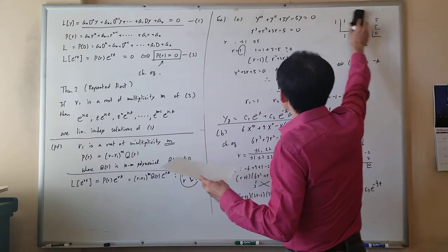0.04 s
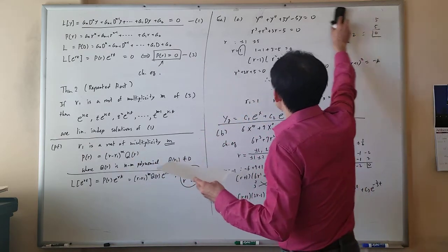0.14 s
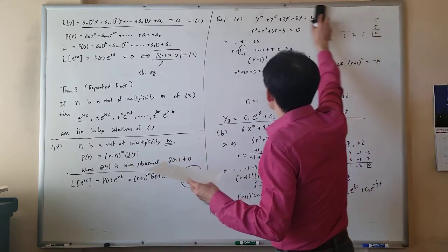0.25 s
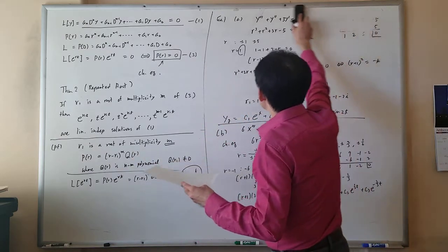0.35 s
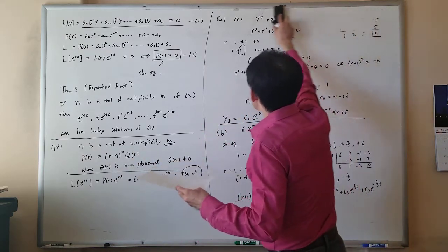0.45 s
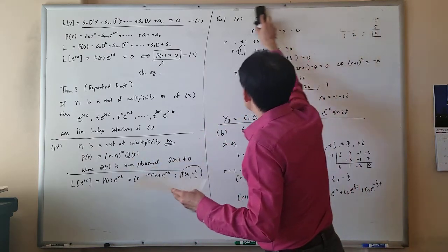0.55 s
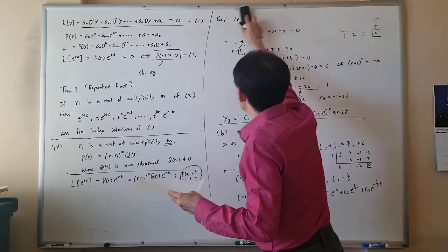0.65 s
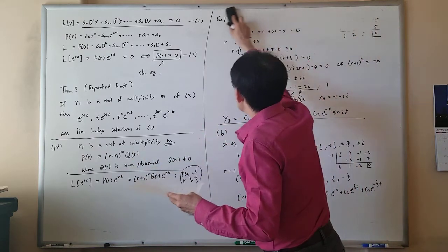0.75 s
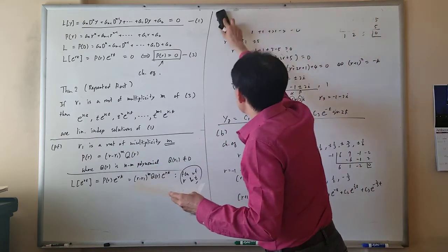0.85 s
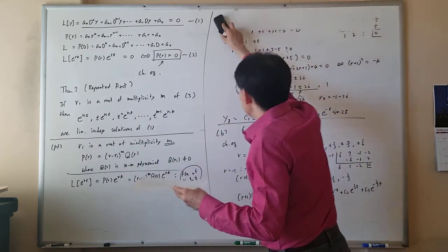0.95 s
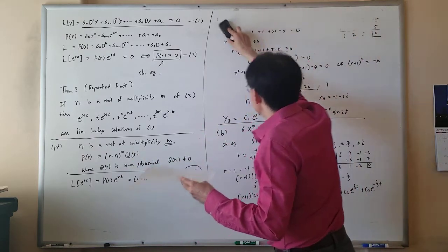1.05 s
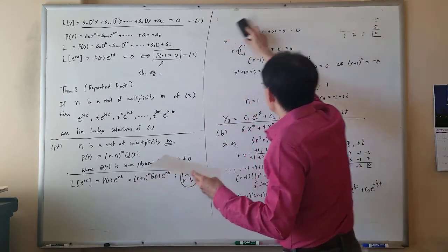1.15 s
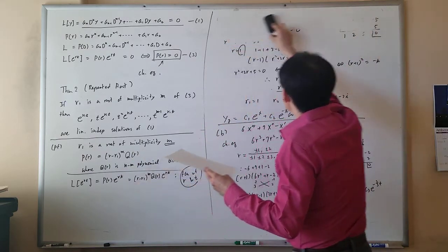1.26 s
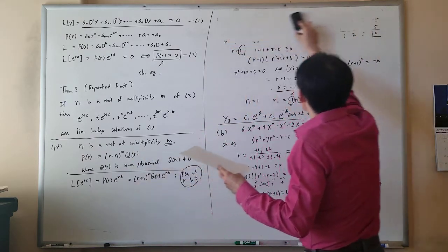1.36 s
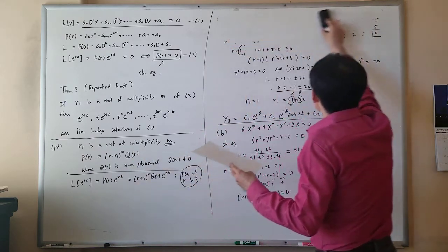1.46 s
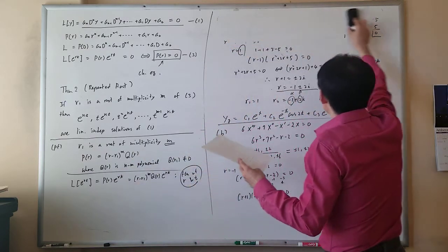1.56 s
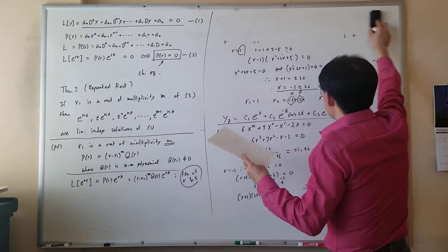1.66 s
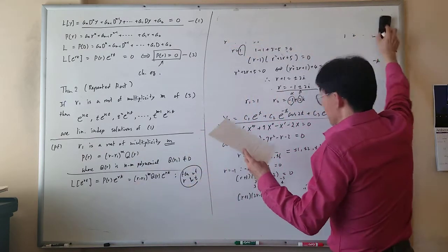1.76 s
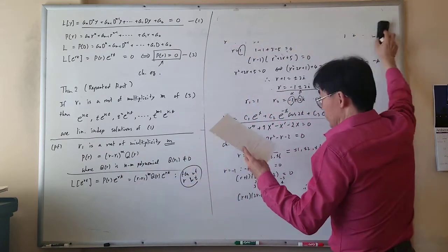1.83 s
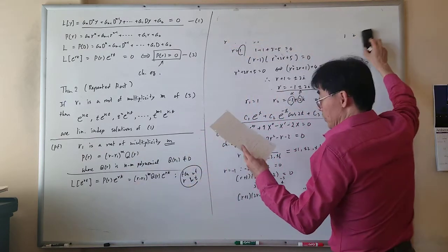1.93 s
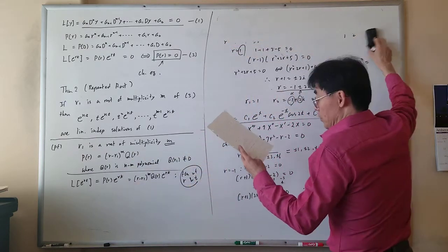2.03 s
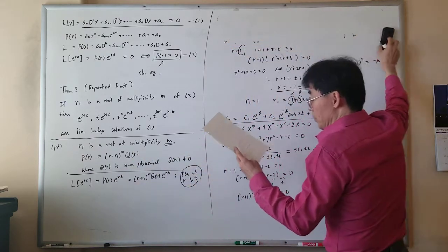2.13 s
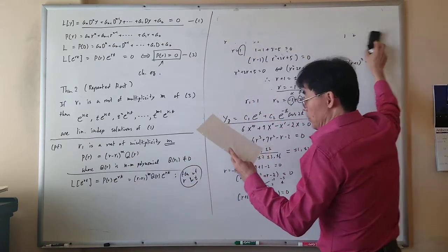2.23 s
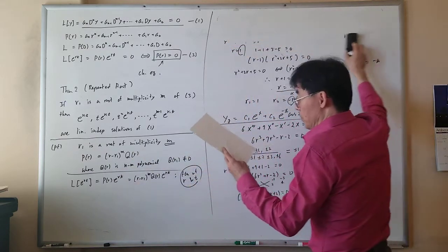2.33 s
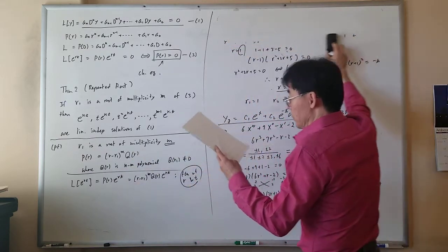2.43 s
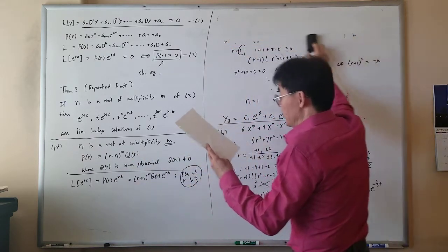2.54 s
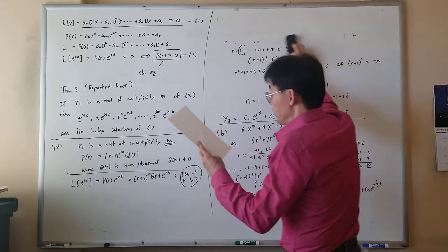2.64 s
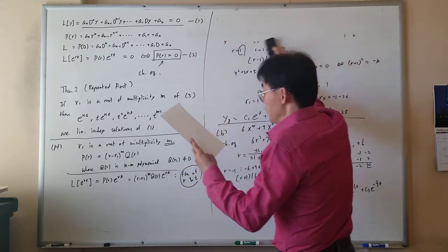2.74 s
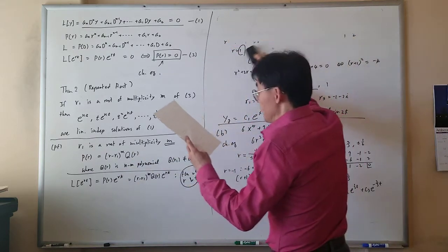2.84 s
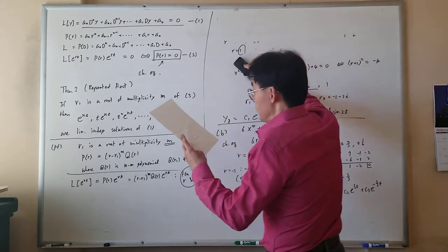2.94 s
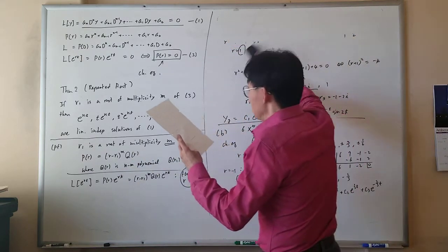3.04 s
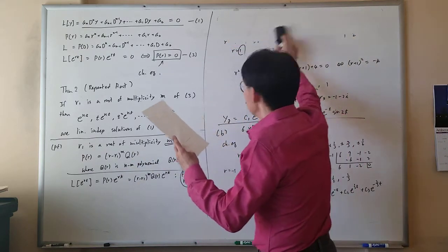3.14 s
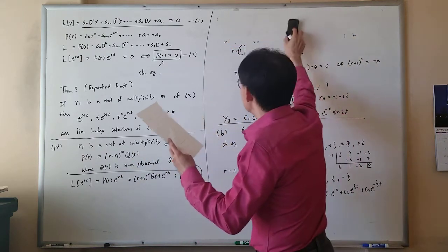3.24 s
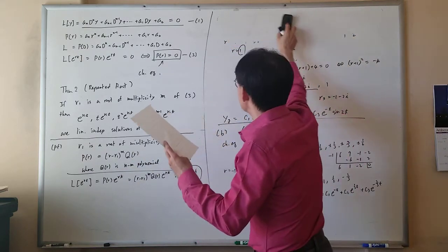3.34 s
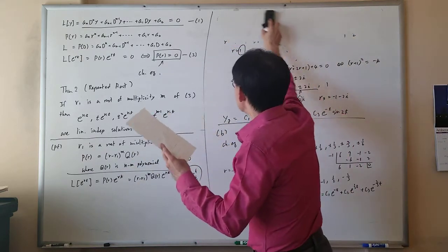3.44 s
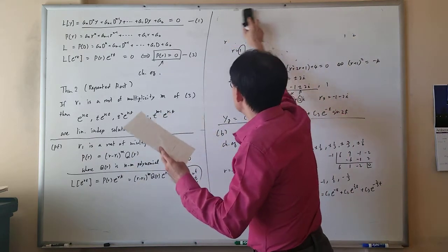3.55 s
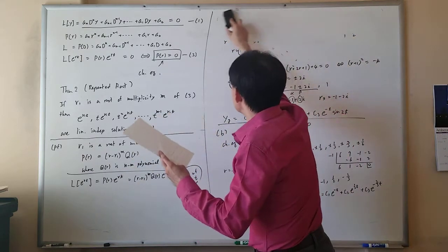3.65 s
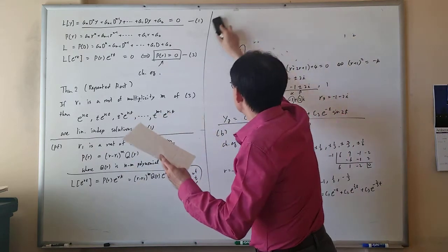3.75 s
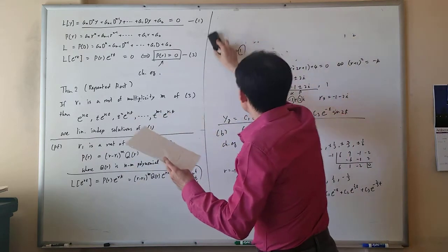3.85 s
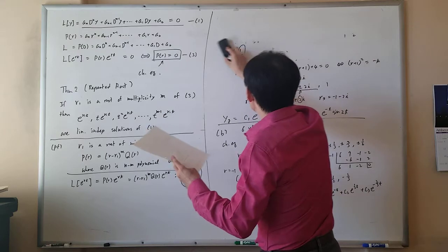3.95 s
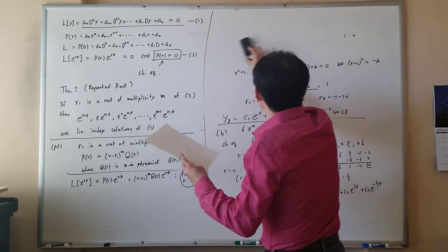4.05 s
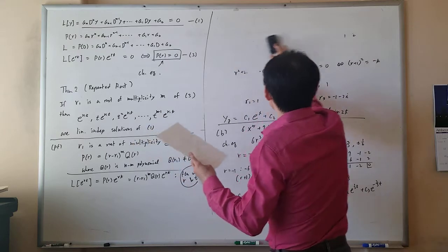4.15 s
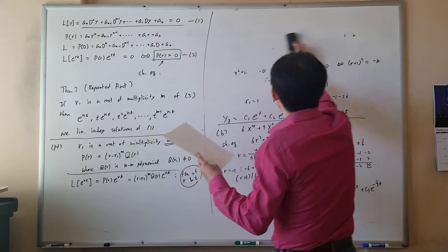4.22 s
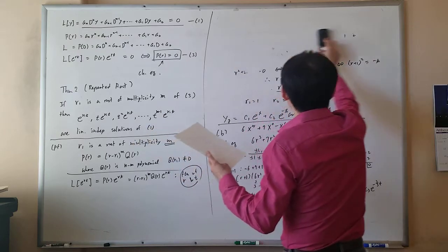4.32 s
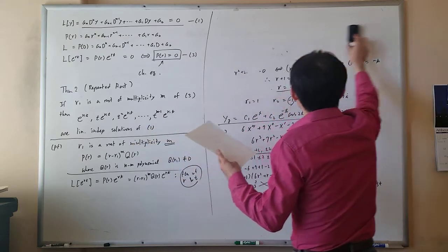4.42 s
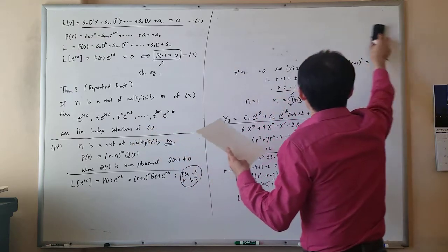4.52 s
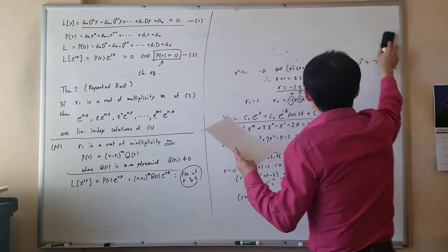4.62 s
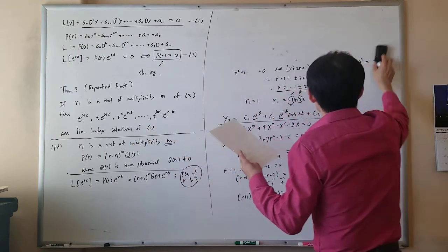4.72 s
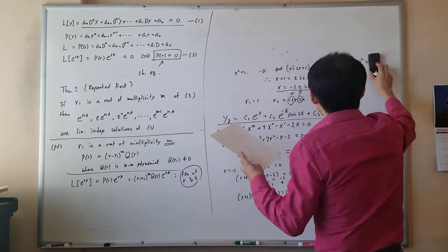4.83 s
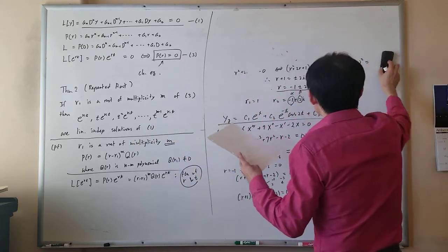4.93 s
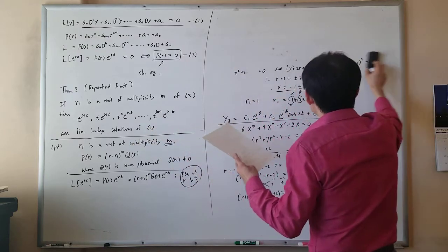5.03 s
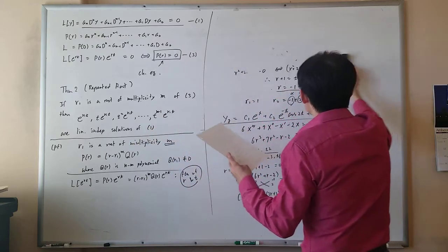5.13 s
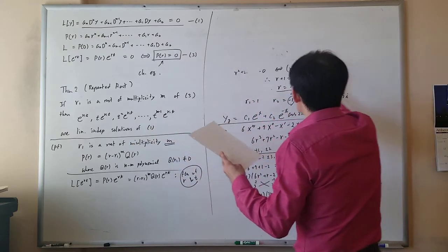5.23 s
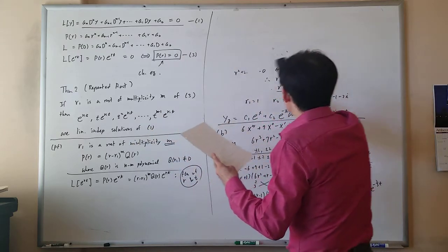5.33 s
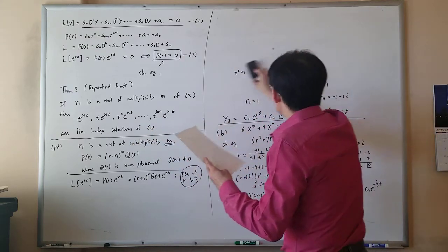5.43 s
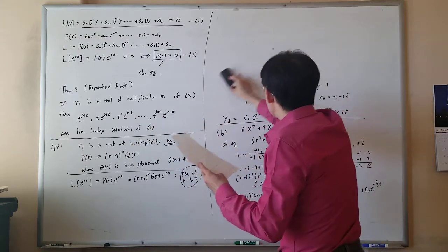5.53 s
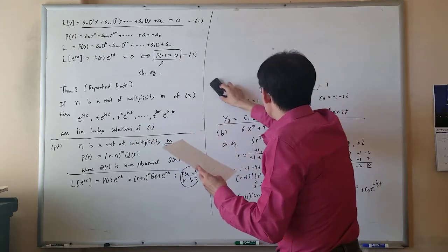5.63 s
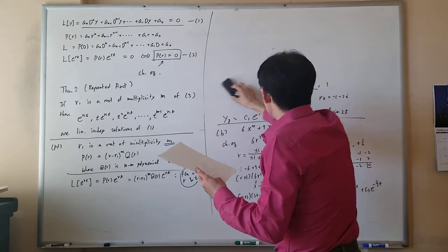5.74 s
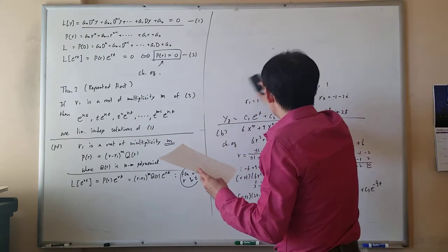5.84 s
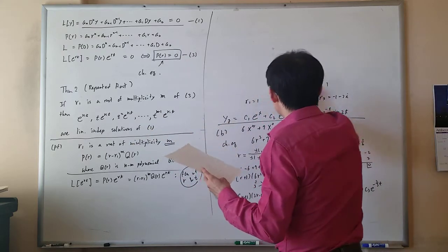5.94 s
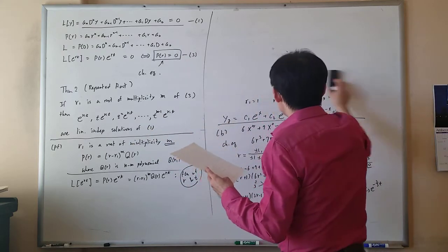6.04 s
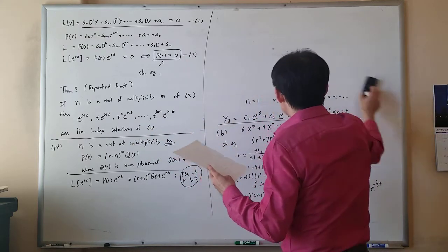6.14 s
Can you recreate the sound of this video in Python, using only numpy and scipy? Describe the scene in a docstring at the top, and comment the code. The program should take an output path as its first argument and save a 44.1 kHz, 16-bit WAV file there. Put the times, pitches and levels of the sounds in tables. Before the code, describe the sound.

In a quiet classroom, a felt eraser rubs a whiteboard in long and short airy hisses that swell and fade. Early on the panel thuds softly, then a knock and quick double click mark the felt being set down. More wipes follow, strongest in the later half, with another dull bump near the end. A faint low fan hums beneath. The stereo pickup is fairly close, its treble opening abruptly with stronger strokes.

```python
"""A felt eraser sweeps to and fro over a wall whiteboard in a quiet classroom, while a ventilation fan hums far off.
Long and short strokes run throughout, each a coloured hiss that swells and fades.
In the first second the panel is bumped and rings, at about 1.0 s the felt edge clicks down twice, and near 5 s
the panel is bumped again. All through, a noise suppressor holds steady treble down and lets each treble band
of each microphone jump forward while a stroke stands above that band's recent average."""
import sys
import numpy as np
from scipy import signal
from scipy.fft import rfft, irfft, next_fast_len
from scipy.io import wavfile
from scipy.ndimage import uniform_filter1d, map_coordinates

SR = 44100
rng = np.random.default_rng(int(sys.argv[2]) if len(sys.argv) > 2 else 0)


def master(y):
    """Save y as 16-bit WAV."""
    cut = np.clip(np.atleast_2d(y).T, -1, 1)
    pcm = np.round(cut * 32767)  # scale
    wavfile.write(sys.argv[1], SR, pcm.astype(np.int16))


N = 272538  # length in samples, about 6.2 s

# The arm's strokes, each from one turn to the next. Each row: turn in seconds, rub at the turn in dB,
# fastest moment in seconds, rub there in dB, power of the rising arch, power of the falling arch,
# felt pressure at start and at end in dB, brightness at start and at end in dB, left minus right in dB.
STROKES = [(0, -77, 0.72, -58, 0.63, .6, 9.5, 3, 1.5, -2, 0.5),
           (.89, -62.5, 1.04, -62.5, 1, 1, -4.5, -0.5, -13, -11, 2.5),
           (1.004, -56, 1.014, -52, 1, 2.4, -1.5, 3, -1, -1, .5),
           (1.207, -57, 1.555, -52, 0.83, 0.45, 1, -1, 5, 1, 0.65),
           (1.81, -61.5, 1.9, -62, 1, 0.99, -0.5, 5.5, -5.5, -5, 2),
           (2.17, -75, 2.53, -58, 0.3, 0.15, 1, -1.5, -1.5, -3.5, 1.95),
           (2.986, -72, 3.03, -61, 0.58, 0.56, -0.5, 0, -1, -5, 2),
           (3.3, -69.5, 3.645, -58.5, 0.76, 1.4, 3.5, -0.5, -6, -1.5, 1.2),
           (3.76, -61, 3.88, -56.5, 0.64, 1.3, 0, -3, -4.5, -2.5, 1),
           (3.99, -56, 4.295, -50, 0.79, 0.85, 3, 4, 3, 2, 1.5),
           (4.65, -64.5, 4.75, -59.5, 1.1, 0.76, 1.5, 0.5, -6, 1, 1.9),
           (4.95, -68.5, 5.46, -51.5, 0.87, 0.92, 3, 5, 2.5, -0.5, 1.5),
           (5.69, -63, 5.976, -51, 1.288, 1.17, 4, 8, 3, 1.5, 2),
           (6.3, -60, 6.4, -60, 1, 1, 5, 5, 0, 0, 2.5)]
DULLING = 0.47  # dB of brightness lost for each dB that the rub lies under its stroke's top
REGRIP_S = 0.11  # seconds over which pressure, brightness and side glide

# Basic colour of the felt's hiss. Each row: frequency in Hz, level in dB per Hz.
FELT_COLOUR = [(180, -29.5), (300, -20), (392, -16), (433, -20.5), (494, -17), (656, -13), (1010, -10.5),
               (1510, -8), (1690, -6.5), (2360, -2), (4440, 0), (5520, -0.5), (9090, -9.5), (13100, -8),
               (16000, -14.5)]
# The felt block's broad resonance: centre in Hz, width in Hz, boost in dB.
BLOCK_RESONANCE = (2350, 390, 2.26)
# Where pressure adds hiss. Each row: frequency in Hz, share from 0 to 1.
PRESSURE_SHARE = [(4600, 0.02), (5500, 0.75), (6800, 0.82), (8000, 1), (9400, 0.76)]
# Where brightness, which drops as the arm slows, adds hiss. Each row: frequency in Hz, share from 0 to 1.
BRIGHTNESS_SHARE = [(7500, 0), (11000, 0.68), (16000, 0.93)]
# Fast strokes thin out the low rub. Each row: frequency in Hz, dB for each dB of rub above its median.
LOW_THINNING = [(250, -0.3), (800, -0.05), (2000, 0)]
# Random patches of louder and softer hiss, below 5000 Hz. Each row: frequency in Hz, depth in dB.
PATCH_DEPTH = [(400, 2.5), (4000, 1.84), (5000, 0)]
# For a while, a band of the hiss is louder or softer on the left or right.
# Each row: start in seconds, end in seconds, centre in Hz, left change in dB, right change in dB.
BAND_CHANGES = [(0.213, 0.97, 10700, -4.5, 0), (0.22, 0.85, 14200, 2.5, -7), (0.31, 0.86, 5500, -2.5, -1),
                (1.186, 1.27, 10200, -5, -6), (2.42, 2.547, 5450, 0.5, 3.5), (3.397, 3.655, 5600, 2, 1.5),
                (3.754, 3.983, 14000, 4.5, -1), (2.45, 3.3, 2370, 1.5, 1.5), (1.2, 1.73, 5550, -3.5, -2),
                (1.65, 1.785, 9100, -5, -8.5), (2.327, 2.75, 7000, 1.5, -0.5), (2.55, 2.846, 10900, 1, 7),
                (3.53, 3.82, 10500, -3, 5.5), (3.536, 3.77, 13300, 7, -1), (3.77, 4, 11200, -1, 7.5),
                (3.99, 4.1, 12600, 4, 3.5), (4.45, 4.58, 12500, 3.5, 3.5), (5.81, 5.9, 12400, 2, 3),
                (5.16, 5.7, 5330, -3.5, -4.5), (5.1, 5.29, 13000, 0, -5), (0.45, 1.17, 1450, 7.5, 4.5),
                (1.48, 2.3, 514, 6.5, 7), (5.2, 6.05, 610, -12, -9)]

# Bumps on the panel. Each row: start in seconds, level in dB before the panel's own colour,
# pitch centre in Hz, spread in octaves, rise in seconds, time to fall 60 dB in seconds.
BUMPS = [(0.304, -51, 376, 0.27, 0.03, 0.32), (.305, -51.5, 160, 0.53, 0.016, 0.34),
         (.40, -55, 100, .3, 0.0062, 0.3), (.50, -48.5, 101.5, 0.33, 0.015, 0.17),
         (.88, -55.5, 610, .8, 0.076, 1), (.974, -46, 600, .25, .002, 0.14),
         (1.013, -47.5, 543, .25, 0.002, 0.076), (1.04, -58.5, 540, 1.1, 0.022, 0.21),
         (4.951, -53, 448, 0.85, 0.069, 0.37), (5.035, -49, 103, 0.28, 0.011, 0.19),
         (5.06, -51, 320, 0.32, 0.0085, 0.095)]
# Ringing modes of the panel. Each row: frequency in Hz, strength in dB.
PANEL_MODES = [(98, 0), (170, -8.5), (250, -1), (325, 1.5), (400, 2), (505, 1.5), (590, 1.5), (700, -7),
               (820, 3.5), (1050, 12), (1500, -5)]
# The felt edge clicks down. Each row: start in seconds, level in dB before smoothing,
# time to fall 60 dB in seconds.
EDGE_CLICKS = [(1.0045, -31, .012), (1.014, -36, .015)]

# Colour of the room's air noise. Each row: frequency in Hz, level in dB per Hz.
AIR_COLOUR = [(12, -70), (20, -36), (53, -39), (98, -3), (198, -17.5), (319, -22), (446, -22.5), (527, -17),
              (1150, -17), (2320, -24), (2530, -19), (5530, -17.5), (16000, -24.5)]
AIR_DB = -65.5  # air noise before the room's level curve
# The fan's blade orders. Each row: frequency in Hz, width in Hz, level in dB before the room's level curve.
FAN_ORDERS = [(58.6, 13, -84), (66, 12, -84), (93.2, 13, -79), (124.2, 7.2, -77), (159.6, 3.8, -83),
              (191.8, 3.9, -94)]
# Level of hum and air together: it drops quickly at the start, recovers, then drifts.
# Each row: time in seconds, change in dB.
ROOM_LEVEL = [(0, 3.5), (.15, -8.5), (.4, -2.5), (1, 0), (1.8, 1.5), (2.6, -1), (3.6, -1), (4.5, 0),
              (5.3, -0.5), (6.18, 2)]
# How alike left and right are. Each row: frequency in Hz, likeness from 0 to 1.
SIDE_LIKENESS = [(60, 0.77), (250, 0.57), (500, 0.52), (1000, 0.008), (16000, 0.016)]

# The microphone's treble colour. Each row: frequency in Hz, change in dB.
MIC_COLOUR = [(6000, 0), (8000, 1.5), (8500, -1), (10500, 0)]
# Edges of the suppressor's bands, in Hz.
BAND_EDGES = [5020, 5950, 7600, 9400, 12100, 16500]
# The suppressor's bands. Each row: left margin in dB, right margin in dB, depth in dB.
SUPPRESSOR_BANDS = [(3, 3.5, 17), (1.5, 2.5, 19.5), (2, 1, 18.5), (3, 1, 17.5), (4.5, 4, 16)]
TOP_HZ = 15780  # nothing passes from here up


def amp(db):
    """Turn dB into gain."""
    return 10 ** (np.asarray(db) / 20)


def unit(x):
    """Scale x to rms 1."""
    return x / np.sqrt(np.mean(x ** 2) + 1e-20)


def along(points, at):
    """Read a curve of (Hz, value) points on a log frequency axis."""
    f, values = np.transpose(points)
    return np.interp(np.log(at + 1), np.log(f + 1), values)


def wobble(rate):
    """A smooth random curve with rate knots a second."""
    knots = rng.standard_normal(int(N * rate / SR) + 4)
    return map_coordinates(knots, [np.arange(N) * rate / SR])


def filtered(x, response):
    """Shape x by a gain that depends on frequency."""
    size = next_fast_len(N + 8192)
    spectrum = rfft(x, size) * response(np.fft.rfftfreq(size, 1 / SR))
    return irfft(spectrum, size)[..., :N]


def rush(response):
    """Stereo noise of rms 1: a shared part makes the bass more alike on both sides than the treble."""
    def mid_and_side(f):
        turn = np.arccos(np.clip(along(SIDE_LIKENESS, f), -1, 1)) / 2
        return response(f) * [np.cos(turn), np.sin(turn)]

    mid, side = filtered(rng.standard_normal((2, N)), mid_and_side)
    return unit(np.array([mid + side, mid - side]))


def eraser(grit_db=0.5, drag_db=0.48, width_octaves=0.16, edge_s=0.014):
    """Dense fibre slips make a hiss that pressure and speed colour, roughened by dried ink."""
    def felt(f):
        resonance = BLOCK_RESONANCE[2] / (1 + ((f - BLOCK_RESONANCE[0]) / BLOCK_RESONANCE[1]) ** 2)
        return amp(along(FELT_COLOUR, f) + resonance)

    hiss = rush(felt)
    # The rub level counts from the strength between 2000 and 4600 Hz.
    hiss = hiss / np.std(filtered(hiss.mean(0), lambda f: (f > 2000) & (f < 4600)))
    hiss = hiss * amp(grit_db * wobble(900) + drag_db * wobble(24.99))

    f, t, z = signal.stft(hiss, SR, nperseg=256)
    rub, press, bright, pan = arm(t)
    # Add up every colour change in dB, for each frequency and moment.
    colour = rub + np.outer(along(PRESSURE_SHARE, f), press) + np.outer(along(BRIGHTNESS_SHARE, f), bright)
    colour = colour + np.outer(along(LOW_THINNING, f), rub - np.median(rub))
    colour = colour + np.multiply.outer([[.5], [-.5]], pan)
    for start, end, centre, left, right in BAND_CHANGES:
        when = (np.tanh((t - start) / edge_s) - np.tanh((t - end) / edge_s)) / 2
        where = np.exp(-(np.log2((f + 1) / centre) / width_octaves) ** 2)
        colour = colour + np.multiply.outer([left, right], np.outer(where, when))
    patches = uniform_filter1d(rng.standard_normal(z.shape), size=2, axis=1)
    patches = uniform_filter1d(patches, size=16, axis=2)
    colour = colour + along(PATCH_DEPTH, f)[:, None] * unit(patches)
    return signal.istft(z * amp(colour), SR, nperseg=256)[1][:, :N]


def arm(t):
    """The rub arches from turn to turn; pressure and brightness drift, and the hiss dulls as the arm slows."""
    turn, low, fastest, top, up, down, press0, press1, bright0, bright1, pan = np.transpose(STROKES)
    k = np.clip(np.searchsorted(turn, t, side="right") - 1, 0, len(turn) - 2)  # the stroke under way
    rising = t < fastest[k]
    end = np.where(rising, k, k + 1)  # the turn on this side of the arch
    swing = np.sin(np.pi / 2 * np.clip((t - turn[end]) / (fastest[k] - turn[end]), 0, 1))
    power = np.abs(np.where(rising, up[k], down[k]))
    rub = low[end] + (top[k] - low[end]) * swing ** power

    done = (t - turn[k]) / (turn[k + 1] - turn[k])  # how much of the stroke's time has passed
    press = press0[k] + (press1[k] - press0[k]) * done
    bright = bright0[k] + (bright1[k] - bright0[k]) * done
    bright = bright - DULLING * (top[k] - rub)

    def glide(values):
        return uniform_filter1d(values, max(1, round(REGRIP_S / (t[1] - t[0]))))

    return rub, glide(press), glide(bright), glide(pan[k])


def bumps(blur=0.083, apart=0.0089, left_db=1):
    """Each bump rings the damped panel modes near its own pitch; the felt edge adds dry noise clicks."""
    out = np.zeros((2, N + SR))
    t = np.arange(SR // 2) / SR
    for s, db, centre, spread, rise, t60 in BUMPS:
        ring = 0
        for f, level in PANEL_MODES:
            share = np.exp(-(np.log2(f / centre) / spread) ** 2)
            # Soft backing smears each mode: its phase wanders, partly apart on the two sides.
            drift = np.cumsum(rng.standard_normal((3, len(t))), axis=1) * np.sqrt(f / 500)
            phase = 2 * np.pi * f * t + blur * drift[0] + apart * drift[1:]
            ring = ring + share * amp(level) * np.sin(phase)
        swell = 1 - np.exp(-(t / rise) ** 2)
        out[:, round(s * SR):][:, :len(t)] += amp(db - 60 * t / t60) * ring * swell
    for s, db, t60 in EDGE_CLICKS:
        click = uniform_filter1d(np.diff(rng.standard_normal((2, len(t) + 1))), size=4)
        out[:, round(s * SR):][:, :len(t)] += click * amp(db - 60 * t / t60)
    # The bumps carry no deep bass.
    thin = filtered(out[:, :N], lambda f: f ** 2 / (f ** 2 + 70 ** 2))
    return thin * amp([[left_db], [-left_db]])


def room():
    """Ventilation: soft air noise, and narrow bands of noise for the unsteady blade orders."""
    hum = 0
    for centre, width, db in FAN_ORDERS:
        hum = hum + amp(db) * rush(lambda f: 1 / (1 + ((f - centre) / width * 2) ** 2))
    air = amp(AIR_DB + 0.27 * wobble(2.3)) * rush(lambda f: amp(along(AIR_COLOUR, f)))
    level_db = np.interp(np.arange(N) / SR, *np.transpose(ROOM_LEVEL))
    return (air + hum) * amp(level_db)


def scene():
    """Everything that reaches the microphones."""
    return eraser() + bumps() + room()


def record(dry, memory_s=1.2, start_db=5, knee_db=3.5, release_s=0.019):
    """Colour the sound, lift each treble band that tops its recent average, then cut the highest treble."""
    coloured = filtered(dry, lambda f: amp(along(MIC_COLOUR, f)))
    f, t, z = signal.stft(coloured, SR, nperseg=512, noverlap=384)
    step = t[1] - t[0]
    keep = np.exp(-step / memory_s)
    hold = np.exp(-step / release_s)  # smoothing power: quick to rise in dB, slow to fall
    gain = np.ones(z.shape)
    for lo, hi, (left, right, depth_db) in zip(BAND_EDGES, BAND_EDGES[1:], SUPPRESSOR_BANDS):
        band = (f >= lo) & (f < hi)
        power = np.mean(np.abs(z[:, band]) ** 2, axis=1)
        power = signal.lfilter([1 - hold], [1, -hold], power)
        level = 10 * np.log10(np.abs(power) + 1e-20)
        first = level[:, 5:25].mean(1, keepdims=True) + start_db  # what the band held before
        usual = signal.lfilter([1 - keep], [1, -keep], level - first, axis=1) + first
        opening = .5 + .5 * np.tanh((level - usual - [[left], [right]]) / knee_db)  # 0 shut, 1 open
        gain[:, band] = amp(depth_db * opening)[:, None]
    out = signal.istft(z * gain, SR, nperseg=512, noverlap=384)[1][:, :N]
    return filtered(out, lambda f: f < TOP_HZ)


dry = scene()
out = record(dry)
master(out)
```